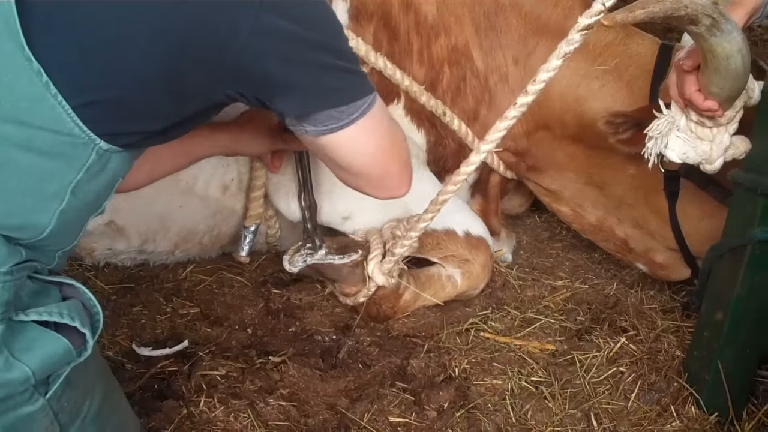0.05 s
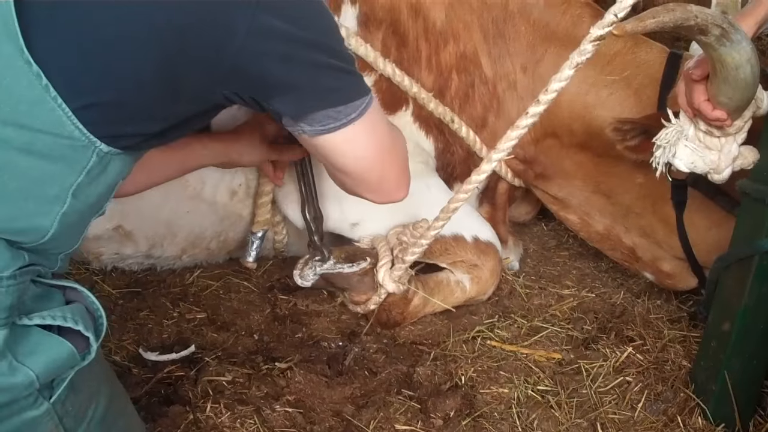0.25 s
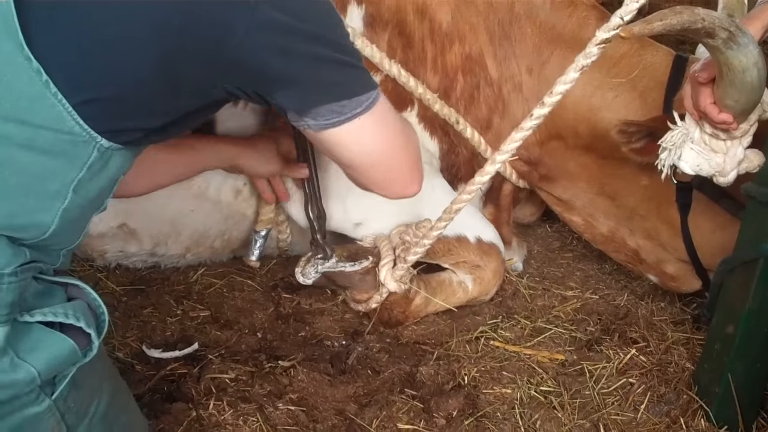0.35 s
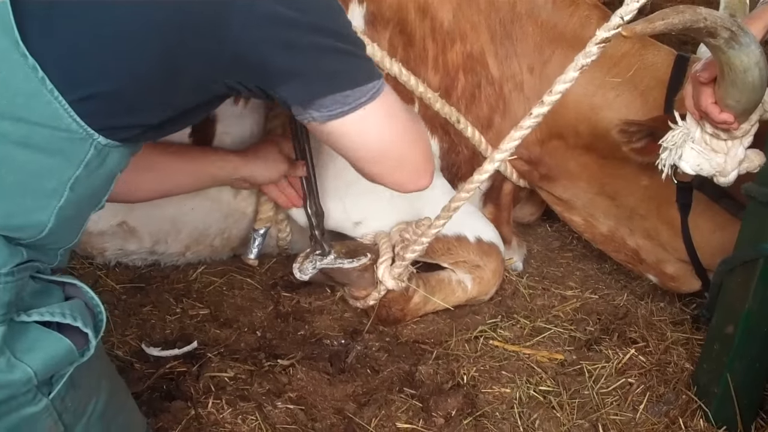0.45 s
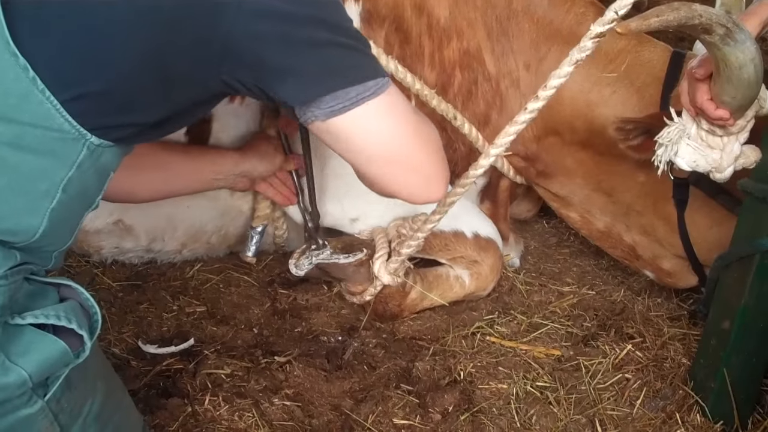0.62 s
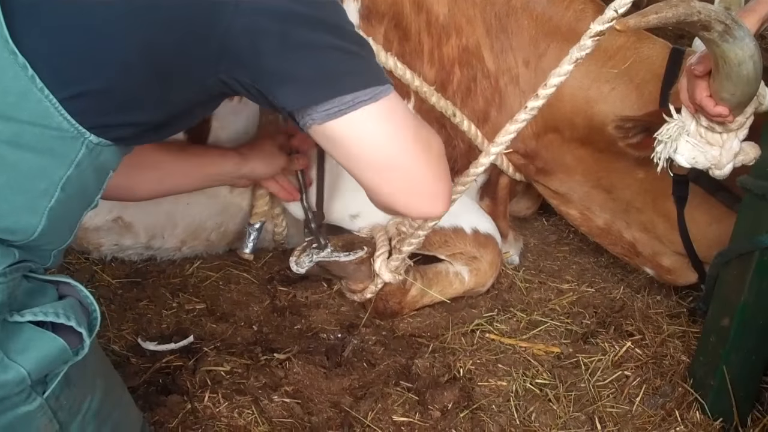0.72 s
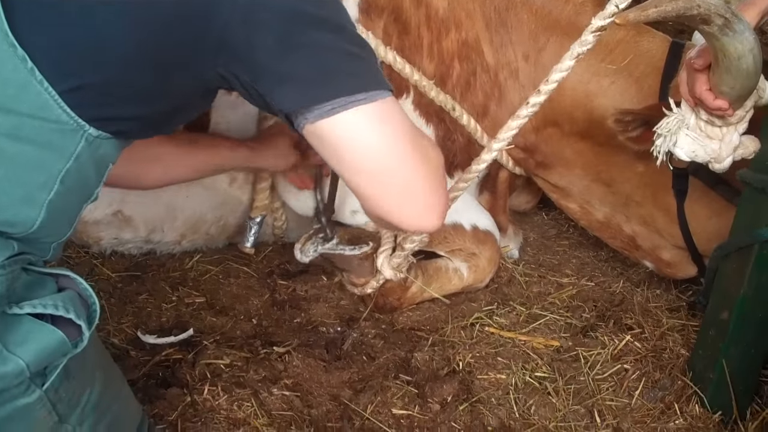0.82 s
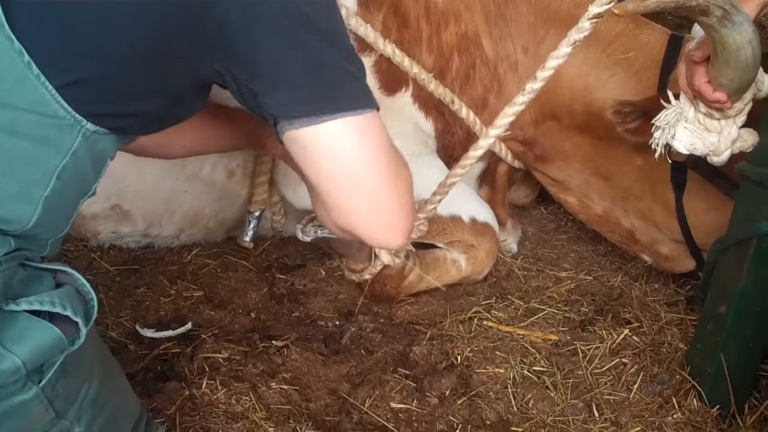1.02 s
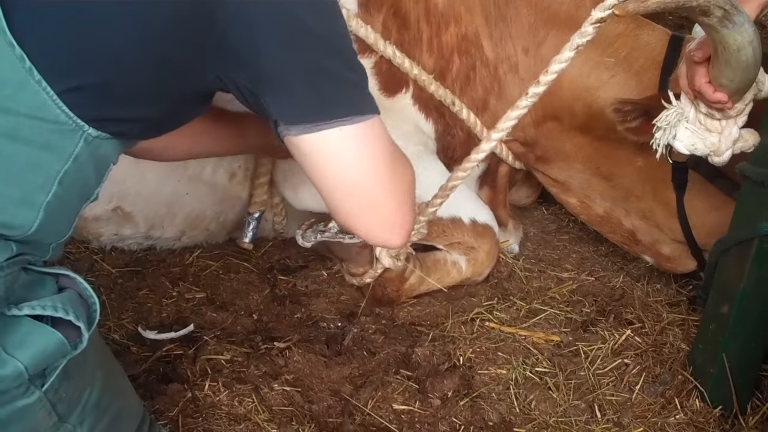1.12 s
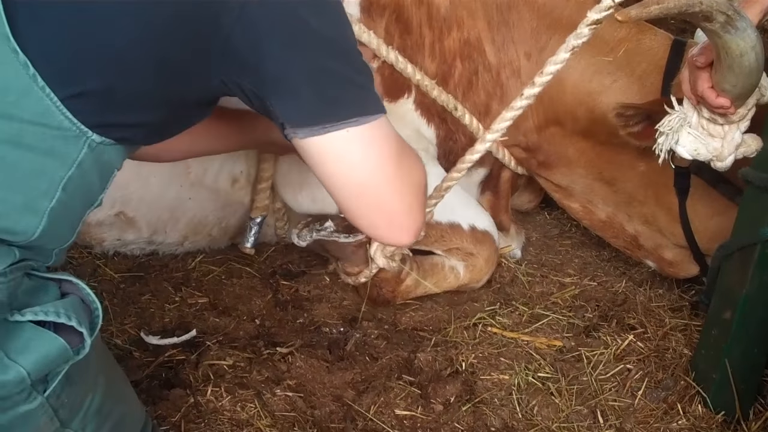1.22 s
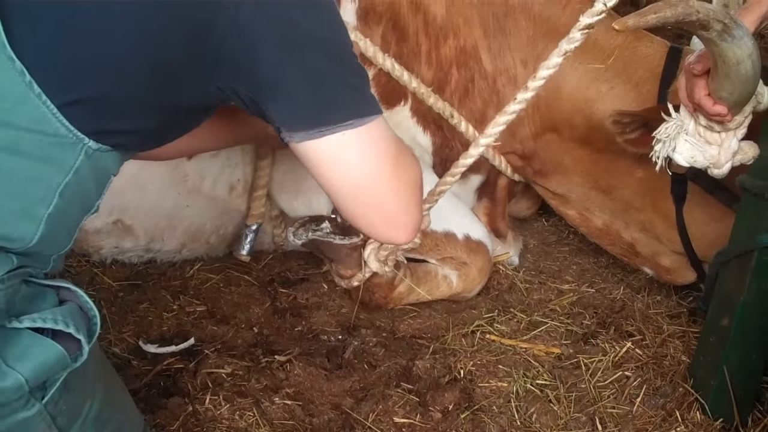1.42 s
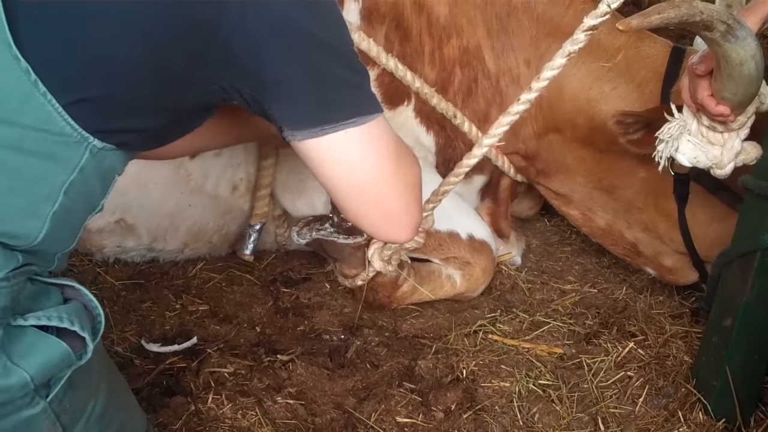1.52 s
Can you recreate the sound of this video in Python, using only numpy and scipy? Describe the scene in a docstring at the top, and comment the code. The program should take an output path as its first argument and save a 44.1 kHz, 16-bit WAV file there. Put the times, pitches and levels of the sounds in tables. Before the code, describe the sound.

Steel nippers snap once through a cow's hoof close to the microphone, with a brief ring and short echo. The quiet farmyard carries on with a faint high insect tone, a low rumble and a few soft thuds.

```python
"""Hoof nippers in a farmyard

Close to the microphone, steel nippers snap once through a cow's hoof: the horn splits, the jaws
ring briefly and nearby walls throw the snap back. Far off, an insect chorus holds a fuzzy high
tone over the yard's rumble, with faint rustles, two dry ticks and a few soft thuds."""
import sys
import numpy as np
from scipy import signal
from scipy.fft import rfft, irfft
from scipy.io import wavfile
from scipy.ndimage import uniform_filter1d

SR = 44100
rng = np.random.default_rng(int(sys.argv[2]) if len(sys.argv) > 2 else 0)


def to_wav(s):
    """Save 16-bit WAV."""
    ch = np.atleast_2d(s).T  # columns
    pcm = np.round(np.clip(ch, -1, 1) * 32767)  # PCM
    wavfile.write(sys.argv[1], SR, pcm.astype(np.int16))


N = 68355
SNAP_AT_S, SNAP_RISE_S = .2252, .0004

# Open yard air. Each row: frequency in Hz, relative level in dB.
AIR_SPECTRUM = [(20, 3.5), (60, -1.5), (131, -3.5), (200, -11), (240, -4), (297, -11.5), (600, -12.5),
                (1230, -18), (2000, -18.5), (3450, -21.5), (6000, -27.5), (10000, -35), (11800, -42.5),
                (12600, -61.5)]
# The air's stereo image. Each row: frequency in Hz, left-right correlation.
AIR_LIKENESS = [(30, .36), (110, .5), (250, .65), (700, .58), (1300, .42), (2400, .3), (4400, .05),
                (12000, .06)]
# Insect groups. Each row: pitch in Hz, width in Hz, relative level in dB, swell in dB per second.
INSECT_GROUPS = [(2052, 40, -3, 2), (2100, 36, -1.5, 2.5), (2165, 40, -1.5, -0.5), (2200, 50, -3, -2)]
# The whole chorus at the microphone. Each row: time in seconds, level in dB.
CHORUS_LEVEL = [(0, -66), (.2, -68.5), (.35, -67.5), (.45, -64), (.65, -65.5), (0.999, -65), (1.3, -65),
                (1.55, -63)]
# Rustles and squeaks. Each row: middle and length in seconds, level in dB, centre and width in Hz.
RUSTLE_SWELLS = [(0.263, 0.37, -63, 1510, 713), (0.391, 0.1, -65.5, 870, 89.7),
                 (0.655, 0.042, -62, 248, 60), (0.877, 0.012, -71, 6290, 450),
                 (0.905, 0.02, -70, 6240, 500), (0.92, 0.011, -76.5, 4760, 503),
                 (0.99, 0.7, -72, 2766, 900)]
# Dry ticks. Each row: start in seconds, level in dB, pan in dB (left minus right).
DRY_TICKS = [(0.0792, -73, -7), (0.9283, -69, -7)]
# Modes of jaws and horn. Each row: frequency in Hz, relative level in dB, t60 in seconds,
# pan in dB, phase lead of the left side in radians.
JAW_MODES = [(366, -35.5, 0.072, -1.5, 0), (567, -48.5, 0.12, -10.5, 0.44),
             (870, -42.5, 0.055, -3.5, -0.35), (1297, -17, 0.045, -1.5, -1.2),
             (1950, -10.5, .018, -3.5, .1), (2585, 1.5, 0.0081, -2, -0.36), (3211, -31.5, 0.015, -4.5, .2),
             (3657, -21.5, 0.036, -1, .2), (4040, -11, 0.034, 0, 0.79), (4450, -6, 0.014, -2.5, -0.22),
             (5090, 1.5, 0.0073, 8.5, -.1), (5580, -7.5, 0.014, 1, 0.56), (6110, -9, .014, 0, .5),
             (6300, -7.5, 0.012, 0.5, 0.99), (7330, -6.5, 0.014, 8.5, -0.93), (7770, -13, .016, 5, -1.5),
             (8880, -8, .012, 4, -1.3), (9240, -9, 0.013, -5.5, -0.86), (9795, -10, 0.0088, -5.5, -1),
             (11040, -6, 0.01, -10, -0.22), (12900, -31.5, .01, 2, 0), (14600, -40, .005, 0, 0),
             (15800, -40, .004, -4, 0)]
# Splitting horn. Each row: frequency in Hz, relative level in dB.
CRACK_SPECTRUM = [(300, -49.5), (1000, -35), (2500, -14), (5000, -12), (8000, -2.5), (11000, -12),
                  (12300, -29), (14000, -50), (16000, -61)]
# Nearby walls. Each row: delay in seconds, gain in dB, pan in dB, low and high edge in Hz.
WALL_ECHOES = [(.0112, -17, 3, 5000, 17000), (.013, -24, 0, 3500, 5500), (.0312, -22, 1, 5500, 8800),
               (.0345, -21, 0, 6800, 8200)]
# Colour of the yard's reverberation. Each row: frequency in Hz, relative level in dB.
TAIL_SPECTRUM = [(300, -11.5), (580, -0.5), (1000, -10.5), (1370, 8), (1800, -0.5), (2500, 1), (3300, -9),
                 (4050, -3), (4700, -7.5), (5900, -1), (6800, -5.5), (7600, -2.5), (9200, -5.5),
                 (10200, -11), (11100, -8), (12200, -21), (13200, -27), (14500, -46)]
# Decay of that reverberation. Each row: frequency in Hz, t60 in seconds.
TAIL_T60 = [(300, .25), (1000, 0.23), (1500, 0.18), (2500, 0.39), (4000, 0.36), (8000, 0.26), (12000, 0.36)]
# Soft thuds. Each row: start in seconds, level in dB, pitch in Hz (minus flips polarity), pan in dB.
SOFT_THUDS = [(.921, -48, -60, 14), (.9302, -40, 135, 14), (.99, -55, 120, 8), (1.116, -46, 50, 0),
              (1.146, -49, 90, 0), (1.18, -47, 120, 0)]


def amp(db):
    return 10 ** (np.asarray(db, float) / 20)


def unit_rms(x):
    return x / np.sqrt(np.mean(x ** 2) + 1e-20)


def curve_at(points, hz):
    f, value = np.transpose(points)
    return np.interp(np.log(hz + 1), np.log(f + 1), value)


def panned(pan_db):
    return amp([[pan_db / 2], [-pan_db / 2]])


def add(mix, start_s, sound):
    part = mix[:, round(start_s * SR):][:, :sound.shape[1]]
    part += sound[:, :part.shape[1]]


def stereo_pair(a, b, likeness):
    """Two independent noises blended into left and right with the given correlation."""
    return np.array([a, likeness * a + np.sqrt(1 - likeness ** 2) * b])


def band(hz, centre_hz, width_hz):
    return np.exp(-np.abs(2 * (hz - centre_hz) / width_hz) ** 4)


def hiss(gain, likeness):
    """Stereo noise of rms 1, shaped by gain(Hz), with left-right correlation likeness(Hz)."""
    hz = np.fft.rfftfreq(1024, 1 / SR)[:, None]
    a, b, c, d = rng.standard_normal((N // 256 + 5, 513, 4)).T
    spectra = stereo_pair(a + 1j * b, c + 1j * d, likeness(hz)) * gain(hz)
    return unit_rms(signal.istft(spectra, nperseg=1024, noverlap=768)[1][:, :N])


def yard_air(level_db=-60, lump_db=2.5, rumble_top_hz=150):
    """All around the microphone, the open yard hisses over a rumble that comes in lumps."""
    lumps_db = lump_db * unit_rms(uniform_filter1d(rng.standard_normal(N // 256 + 5), size=6))

    def gain(hz):
        return amp(curve_at(AIR_SPECTRUM, hz) + lumps_db / (1 + (hz / rumble_top_hz) ** 2))
    return amp(level_db) * hiss(gain, lambda hz: curve_at(AIR_LIKENESS, hz))


def insect_chorus():
    """Far off, groups of insects at close pitches blur into one narrow, nearly steady band."""
    t, hz = np.arange(N) / SR, np.fft.rfftfreq(N, 1 / SR)
    noises = rng.standard_normal((N, len(INSECT_GROUPS), 2)).T
    tone = np.zeros((2, N))
    for a, b, (pitch, width, db, swell) in zip(*noises, INSECT_GROUPS):
        song = irfft(rfft(stereo_pair(a, b, likeness=.058)) * band(hz, pitch, width), N)
        tone += amp(db + swell * (t - t.mean())) * unit_rms(song)
    running_rms = np.sqrt(uniform_filter1d((tone ** 2).mean(0), size=SR // 6))
    return amp(np.interp(t, *np.transpose(CHORUS_LEVEL))) * tone / running_rms


def rustles():
    """Faint bands of noise swell and fade."""
    out, t = np.zeros((2, N)), np.arange(N) / SR
    for middle, length, db, centre, width in RUSTLE_SWELLS:
        swell = amp(db) * np.exp(-(2 * (t - middle) / length) ** 2)
        out += swell * hiss(lambda hz: band(hz, centre, width), likeness=lambda hz: .5)
    return out


def ticks(band_hz=(7600, 11000), rise_s=.001):
    """Tiny, dry bursts of bright noise."""
    out, t = np.zeros((2, N)), np.arange(3000) / SR
    envelope = t / rise_s * np.exp(1 - t / rise_s)
    bandpass = signal.butter(4, band_hz, "band", fs=SR)
    for start, db, pan in DRY_TICKS:
        burst = unit_rms(signal.lfilter(*bandpass, rng.standard_normal(len(t))))
        add(out, start, amp(db) * panned(pan) * burst * envelope)
    return out


def jaw_snap(level_db=-14, earliest_hz=5200, lag_s_per_octave=.00009, rise_cycles=.95):
    """Close up, the horn gives way and the jaws meet: their modes start nearly in step."""
    out, t = np.zeros((2, 4096)), np.arange(4096) / SR
    for hz, db, t60, pan, lead in JAW_MODES:
        peak_s = SNAP_RISE_S + lag_s_per_octave * abs(np.log2(hz / earliest_hz))
        phase = 2 * np.pi * hz * (t - peak_s) + np.array([[lead / 2], [-lead / 2]])
        rise_s = max(SNAP_RISE_S, rise_cycles / hz)  # low modes build up more slowly
        attack = np.sin(np.pi / 2 * np.minimum(t / rise_s, 1)) ** 2
        out -= amp(db - 60 * t / t60) * panned(pan) * np.cos(phase) * attack
    return amp(level_db) * out


def horn_crack(level_db=-27, t60=.014):
    """A burst of dense noise as the horn splits."""
    t, hz = np.arange(4096) / SR, np.fft.rfftfreq(4096, 1 / SR)
    noise = stereo_pair(*rng.standard_normal((2, 4096)), likeness=.85)
    burst = unit_rms(irfft(rfft(noise) * amp(curve_at(CRACK_SPECTRUM, hz))))
    return amp(level_db - 60 * t / t60) * burst * np.minimum(t / SNAP_RISE_S, 1)


def wall_echoes(cut, fade_t60=.044):
    """Nearby walls return shortened copies of the cut, each coloured by what it bounces off."""
    out, t = np.zeros((2, SR // 2)), np.arange(cut.shape[1]) / SR
    shortened = cut * amp(-60 * t / fade_t60)
    for delay, db, pan, *edges in WALL_ECHOES:
        echo = signal.lfilter(*signal.butter(2, edges, "band", fs=SR), shortened)
        add(out, delay, amp(db) * panned(pan) * echo)
    return out


def yard_tail(gain_db=-32, rise_s=.0023, patchy_db=1):
    """The snap scatters around the yard: patchy noise, each band dying at its own speed."""
    t = np.arange(SR // 2) / SR
    noise = stereo_pair(*rng.standard_normal((2, len(t))), likeness=.35)
    hz, frame_s, spectra = signal.stft(noise, SR, nperseg=256)
    patches = rng.standard_normal((len(frame_s), len(hz))).T
    patches = uniform_filter1d(patches, size=6, axis=0)  # across frequency
    patches = uniform_filter1d(patches, size=2, axis=1)  # across time
    colour_db = patchy_db * unit_rms(patches) + curve_at(TAIL_SPECTRUM, hz)[:, None]
    decay_db = 60 * frame_s / curve_at(TAIL_T60, hz)[:, None]
    tail = signal.istft(spectra * amp(colour_db - decay_db), SR, nperseg=256)[1][:, :len(t)]
    return amp(gain_db) * tail * np.minimum(t / rise_s, 1)


def thuds(t60=.028, rise_s=.0031):
    """Soft, low tones that die almost at once."""
    out, t = np.zeros((2, N)), np.arange(3000) / SR
    envelope = amp(-60 * t / t60) * np.minimum(t / rise_s, 1)
    for start, db, hz, pan in SOFT_THUDS:
        add(out, start, amp(db) * panned(pan) * np.sin(2 * np.pi * hz * t) * envelope)
    return out


def scene():
    """One close cut and its echoes stand out against the quiet yard."""
    mix = yard_air() + insect_chorus() + rustles() + ticks() + thuds()
    cut = jaw_snap() + horn_crack()
    for part in (cut, wall_echoes(cut), yard_tail()):
        add(mix, SNAP_AT_S, part)
    return mix


def record(dry, top_hz=16600):
    """The microphone's signal is cut off steeply in the top treble."""
    lowpass = signal.firwin(511, top_hz, window=("kaiser", 9), fs=SR)
    return signal.oaconvolve(dry, lowpass[None], "same")


dry = scene()
out = record(dry)
to_wav(out)
```